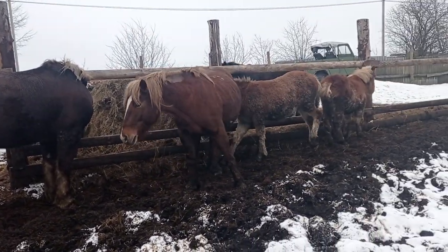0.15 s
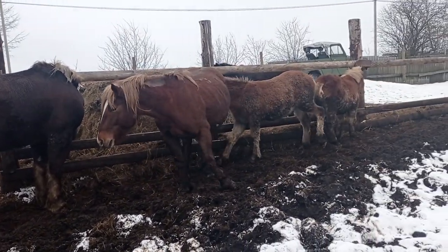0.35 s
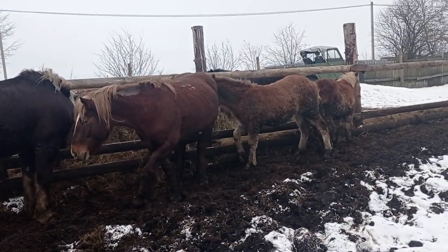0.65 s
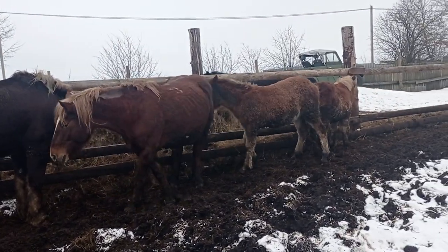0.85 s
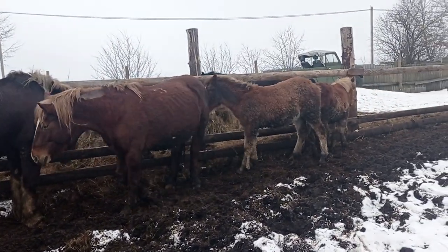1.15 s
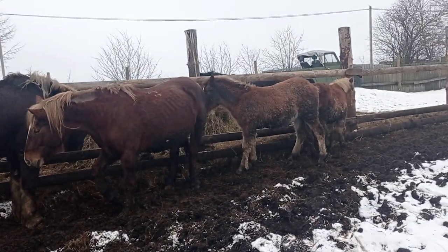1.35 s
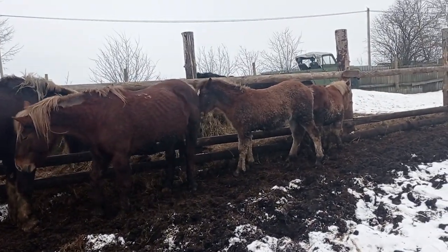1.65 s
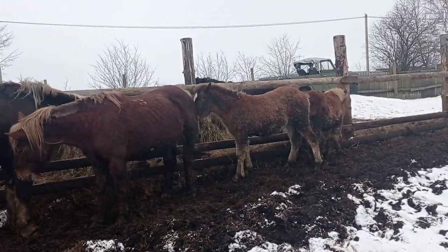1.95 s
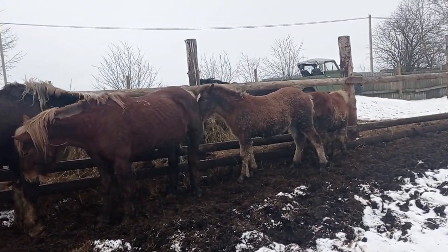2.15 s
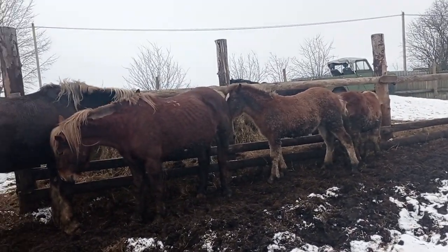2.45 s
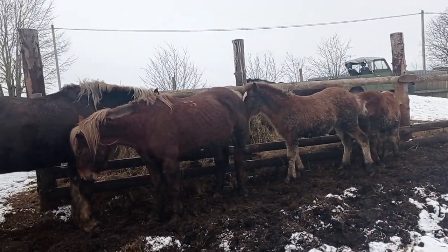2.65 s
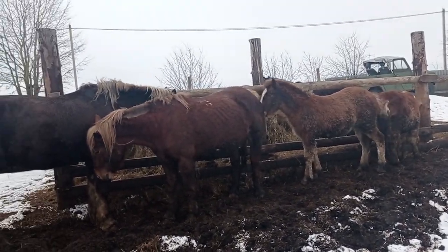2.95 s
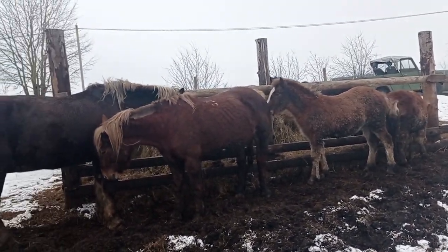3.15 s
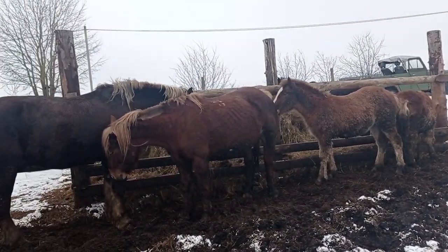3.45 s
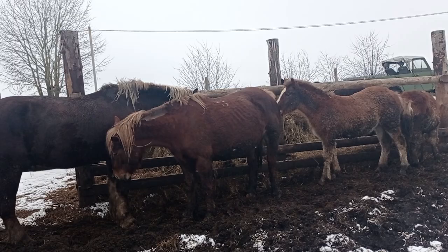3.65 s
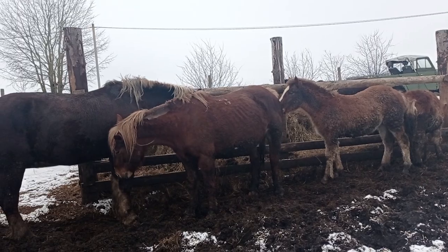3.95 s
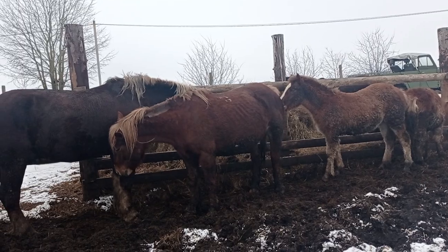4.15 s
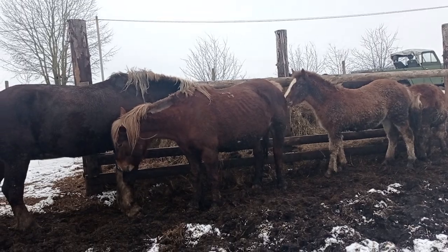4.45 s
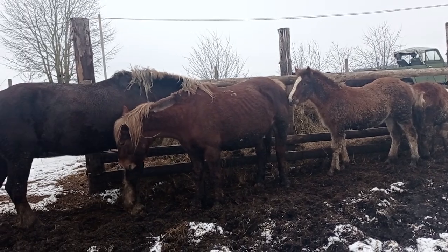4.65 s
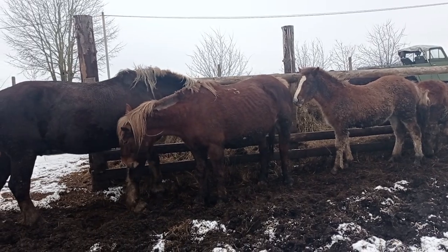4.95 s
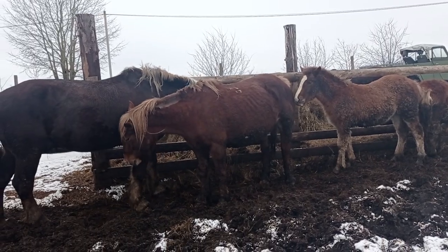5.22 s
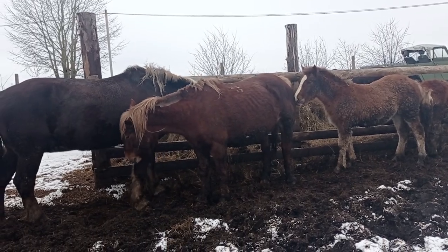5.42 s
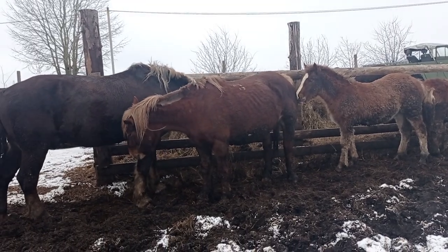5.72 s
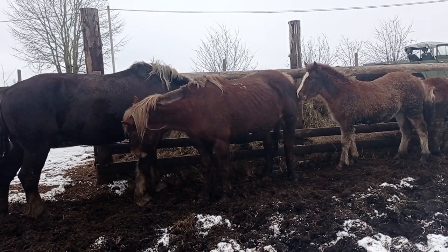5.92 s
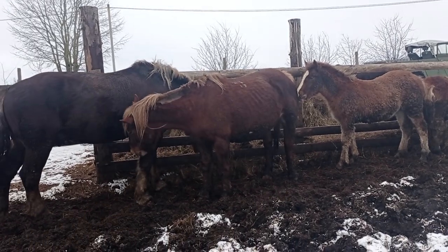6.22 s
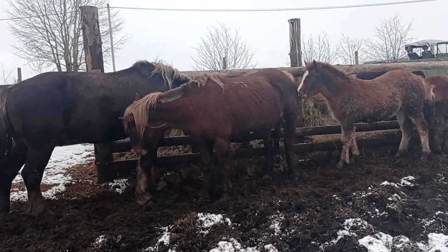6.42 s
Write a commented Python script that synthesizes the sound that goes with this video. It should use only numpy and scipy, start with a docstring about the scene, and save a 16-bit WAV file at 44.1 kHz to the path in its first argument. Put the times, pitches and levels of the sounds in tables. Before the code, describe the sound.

Outdoors in a muddy winter paddock, a dry steel joint squeals high and unevenly in repeated swings, with gritty rasping, small jolts and a few dull early thuds. Wind buffets the single close microphone at first. After about 4.7 seconds the squeal stops; hay stalks crackle and snap sparsely, then loudly near six seconds, over a faint open-field hiss.

```python
"""A dry steel joint squeals as it swings to and fro beside a hay rack in a muddy winter paddock.
The squeal is a wavering tone with overtones and a rough skirt; sliding rasps through the frame as
noise on its modes. Horses pull hay: stalks rustle and snap as broken-up noise. Thuds are low, dying
sines. Wind buffets the single microphone as patchy low noise, over the hiss of the open field."""
import sys
import numpy as np
from scipy import signal
from scipy.fft import rfft, irfft, next_fast_len
from scipy.io import wavfile
from scipy.ndimage import uniform_filter1d, map_coordinates

SR = 44100
rng = np.random.default_rng(int(sys.argv[2]) if len(sys.argv) > 2 else 0)


def to_wav(sig):
    """Store sig (one row per channel, or 1-D mono) as 16-bit WAV at the path in sys.argv[1].

    Samples outside -1..1 are clipped; the rate is SR.
    """
    pcm = np.clip(np.atleast_2d(sig), -1, 1) * 32767
    pcm = np.round(pcm).astype(np.int16)
    wavfile.write(sys.argv[1], SR, pcm.T)  # frames by channels


N = 290341  # samples


def amp(db):
    """Amplitude ratio of a level in dB."""
    return 10 ** (np.asarray(db) / 20)


def unit(x):
    """x scaled to rms 1."""
    return x / np.sqrt(np.mean(x ** 2) + 1e-20)


def curves(rows):
    """One value per sample for each column after the time."""
    s, *cols = np.transpose(rows)
    return [np.interp(np.arange(N) / SR, s, c) for c in cols]


def wobble(rate):
    """A smooth random curve, rate knots a second."""
    knots = rng.standard_normal(int(N * rate / SR) + 4)
    return map_coordinates(knots, [np.arange(N) * rate / SR])


def filtered(x, response):
    """x times a complex response of frequency."""
    m = next_fast_len(N + SR // 2)
    return irfft(rfft(x, m) * response(np.fft.rfftfreq(m, 1 / SR)), m)[..., :N]


def colour(points):
    """Gain through (Hz, dB) points on a log frequency axis."""
    f, db = np.transpose(points)
    return lambda hz: amp(np.interp(np.log(hz + 1), np.log(f + 1), db))


def modes(table):
    """Causal response of a set of resonances, each applied twice for dark valleys."""
    def response(f):
        return sum(amp(db) * (1j * f * width / (centre * centre - f * f + 1j * f * width)) ** 2
                   for centre, width, db in table)
    return response


def noise(response, patchy_db):
    """Coloured noise of rms 1 with time-frequency patches of random gain."""
    z = signal.stft(rng.standard_normal(N), nperseg=512)[2]
    field = uniform_filter1d(uniform_filter1d(rng.standard_normal(z.shape), 5, 0), 10, 1)
    patchy = signal.istft(z * amp(patchy_db * unit(field)), nperseg=512)[1][:N]
    return unit(filtered(patchy, response))


def bursts(times, dbs, t60s, attack):
    """An envelope that rises fast at each time and dies away, followed for half a second."""
    env, t = np.zeros(N + SR), np.arange(SR // 2) / SR
    for s, db, t60 in zip(times, dbs, t60s):
        env[round(s * SR):][:len(t)] += amp(db - 60 * t / max(t60, .005)) * (1 - np.exp(-t / attack))
    return env[:N]


def swells(times, dbs, t60s, rise):
    """An envelope that builds to each time and dies away; the build lasts rise times the decay."""
    t = np.arange(0, N, 64) / SR
    late = (t - np.c_[times]) / np.c_[np.maximum(t60s, .02)]
    coarse = amp(np.c_[dbs] - 60 * np.maximum(late, -late / rise)).sum(axis=0)
    return np.interp(np.arange(N) / SR, t, coarse)


def squeal():
    """Stick-slip locks on the main mode; the uneven grip frays it and adds overtones."""
    # the squeal's path, one list per swing of the joint: time_s, pitch_hz, level_db
    swings = [
        [(0.0, 3800, -53), (0.012, 3806, -39), (0.024, 3800, -53), (0.062, 3794, -35), (0.156, 3786, -65),
         (0.288, 3830, -42), (0.292, 3803, -61), (0.306, 3794, -36.5), (0.356, 3774, -30.5), (0.37, 3826, -40),
         (0.566, 3736, -67.5), (0.68, 3815, -73)],
        [(0.72, 3950, -78), (0.744, 3789, -53.5), (0.878, 3797, -65), (0.892, 3761, -50), (0.928, 3780, -35),
         (1.042, 3780, -66), (1.05, 3856, -54), (1.186, 3739, -50.5), (1.196, 3780, -38), (1.262, 3864, -57),
         (1.442, 3820, -91), (1.45, 3760, -79)],
        [(1.6, 3949, -95), (1.634, 3824, -54.5), (1.68, 3803, -50.5), (1.704, 3777, -71.5),
         (1.792, 3980, -48.5), (1.932, 3830, -82), (1.946, 3885, -53), (1.958, 3995, -64), (2.084, 3704, -67),
         (2.114, 3826, -42), (2.174, 3830, -39), (2.36, 3821, -73.5)],
        [(2.39, 3820, -78), (2.408, 3757, -43), (2.448, 3790, -33.5), (2.474, 3800, -49), (2.54, 3760, -26.5),
         (2.558, 3858, -44), (2.654, 3815, -37), (2.72, 3820, -59), (2.764, 3780, -49), (2.854, 3848, -63),
         (2.956, 3814, -54.5), (3.1, 3870, -81)],
        [(3.15, 3790, -96), (3.176, 3755, -49), (3.218, 3786, -46.5), (3.352, 3797, -43.5), (3.41, 3750, -58.5),
         (3.444, 3923, -61), (3.454, 3773, -61), (3.534, 3828, -47), (3.614, 3932, -61.5), (3.786, 3780, -63),
         (3.808, 3840, -49), (3.93, 3704, -88.5)],
        [(3.96, 3800, -85), (4.03, 3797, -48), (4.072, 3770, -55.5), (4.164, 3720, -37), (4.196, 3770, -54),
         (4.212, 3830, -44.5), (4.322, 3796, -64.5), (4.35, 3768, -42.5), (4.508, 3773, -58.5),
         (4.578, 3840, -55.5), (4.672, 3905, -86), (4.7, 3680, -72)],
    ]
    # sharpness of the slips, one row a swing, octave re main line: at_start_db, at_end_db
    octave_db = [(-24.5, -8), (-21, -5.5), (-21, -28.5), (-21, -19), (-11, -30), (-25, -6.5)]
    # moments where the joint grips suddenly and the squeal jumps: start_s, level_db
    catches = [(0.0443, -37), (0.306, -38), (0.8917, -46), (1.1924, -44), (2.49, -32), (2.526, -39),
               (4.126, -35.5), (4.348, -39), (4.3932, -37)]
    catch_t60_s, catch_attack_s = 0.046, 0.0046
    octave_grows, firm_db = 0.9, -41  # exponent of octave level against the main line, about this level

    hz, db = curves(np.concatenate(swings))
    sharp_rows = [(swing[end][0], pair[end]) for swing, pair in zip(swings, octave_db) for end in (0, -1)]
    sharp_db, = curves(sharp_rows)
    s, catch_db = np.transpose(catches)
    fade = np.clip((swings[-1][-1][0] - np.arange(N) / SR) / 0.022, 0, 1)

    # a weak squeal locks loosely and wanders more
    loose = np.clip((-25.0 - db) / 14, .3, 1.6)
    wander_hz = loose * (16 * wobble(60) + 9 * wobble(300))
    phase = 2 * np.pi * np.cumsum(hz + wander_hz) / SR
    grip_db = 3 * wobble(70)

    # the overtones beat and blur more than the main line
    def fray(rate):
        return wobble(rate) + 1.26
    overtones = (fray(120) + .5 * wobble(600)) * np.sin(2 * phase)
    overtones += amp(-27.0) * fray(200) * np.sin(3 * phase)
    overtones += amp(-44.0) * fray(300) * np.sin(4 * phase)

    level = np.sqrt(2) * amp(db) + bursts(s, catch_db, np.full(len(s), catch_t60_s), catch_attack_s)
    main_line = level * amp(loose * grip_db) * np.sin(phase)
    octave_level = level * (level / amp(firm_db)) ** (octave_grows - 1)
    tone = main_line + octave_level * amp(sharp_db + grip_db) * overtones

    # skipped slips spread a rough skirt round the main line
    skirt_modes = modes([(3500, 110, -3), (3747, 200, 2.5), (3990, 72, -3)])
    skirt = loose ** 2 * amp(db - 11) * noise(skirt_modes, patchy_db=5.5)

    # two slips at once rub against each other: sum and difference tones
    rub = 1 + amp(13.0) * fade * amp(db) * np.sin(phase)
    return fade * (tone + skirt) + squeaks() * rub


def squeaks():
    """Brief slips that lock on one mode: a quick start, an uneven hold, a soft end."""
    # short squeaks and hums: start_s, length_s, first_hz, last_hz, level_db (before the grip and 1 dB lift)
    brief_slips = [(.16, 0.083, 2518, 2490, -52), (.21, 0.074, 6400, 6080, -52),
                   (.91, 0.11, 4120, 4170, -50), (1.15, 0.082, 2520, 2550, -54.5),
                   (1.628, .13, 3580, 3440, -59), (1.765, 0.085, 4340, 4170, -51.5),
                   (1.797, 0.12, 311, 305, -63.5), (1.81, .057, 12100, 12300, -69),
                   (2.02, 0.08, 5490, 5520, -46), (2.187, .18, 317.6, 299, -62.5),
                   (2.409, 0.15, 6470, 6430, -51.5), (2.423, 0.24, 2665, 2590, -68),
                   (2.583, 0.12, 307, 308, -63.5), (2.79, 0.094, 6100, 6260, -63),
                   (2.96, 0.12, 296, 302, -55), (3.15, 0.064, 5000, 4990, -56),
                   (3.211, .13, 1900, 1910, -55.5), (3.37, 0.088, 306, 312, -61.5),
                   (3.539, 0.13, 1592, 1618, -47.5), (3.7, 0.29, 313, 317.6, -61),
                   (3.831, 0.12, 536, 527.5, -62), (3.97, 0.1, 4964, 4887, -56),
                   (4.017, 0.13, 2630, 2630, -61), (4.032, .18, 6420, 6500, -60.5),
                   (4.04, 0.095, 5250, 5200, -56.5), (4.209, 0.13, 312, 315, -65.5),
                   (4.518, 0.12, 4110, 4104, -54.5), (4.552, 0.045, 1606, 1616, -53),
                   (4.626, 0.154, 2760, 2900, -56.5), (4.652, .28, 325, 308.4, -68),
                   (4.63, 0.15, 3910, 3340, -67), (4.703, 0.18, 3570, 3270, -57.5),
                   (4.915, 0.027, 2170, 1880, -56), (5.323, 0.087, 5800, 5730, -72),
                   (5.321, 0.14, 2900, 2860, -64.5), (5.33, .19, 529, 513, -71),
                   (5.822, .11, 1298, 1220, -66.5), (5.831, 0.044, 3870, 3900, -65),
                   (5.988, .06, 5360, 5350, -73), (5.985, 0.22, 1260, 1252, -68),
                   (5.998, .026, 3770, 3770, -60), (5.998, 0.07, 1550, 1583, -58.5),
                   (6.0, .035, 6170, 6140, -67), (6.423, 0.15, 1623, 1655, -63),
                   (6.453, .13, 296, 293, -62.5)]
    waver_floor_hz, waver_share = 7, 0.0022  # the pitch wavers more on high modes
    waver_per_glide = .8  # Hz of blur per Hz of glide

    out = np.zeros(N + SR)
    waver, blur = wobble(150), wobble(700)
    grip = amp(1.9 * wobble(60)) * (1.12 + .5 * wobble(160) + 0.214 * wobble(700))
    for s, length, hz0, hz1, db in brief_slips:
        # a gliding slip locks poorly and blurs into a rough band
        waver_hz = (waver_floor_hz + waver_share * hz0) * waver
        waver_hz = waver_hz + waver_per_glide * abs(hz1 - hz0) * blur
        u, i = np.linspace(0, 1, round(length * SR)), round(s * SR)
        phase = 2 * np.pi * np.cumsum(hz0 + (hz1 - hz0) * u + waver_hz[i:][:len(u)]) / SR
        shape = grip[i:][:len(u)] * np.sin(np.pi * u ** 0.59)
        out[i:][:len(u)] += amp(db + 1) * shape * np.sin(phase)
    return out[:N]


def rasp():
    """Sliding grit rasps and drives the frame's modes; each jolt makes both leap up and die away."""
    # sliding strokes, nominal levels: peak_s, rasp_db, t60_s, low_re_rasp_db, middle_re_rasp_db
    slides = [(0.03, -54, 1, 5, -2.5), (0.22, -52, 0.89, -11, -1.5), (0.328, -43.5, 0.46, 2, -6),
              (0.741, -59.5, 0.86, 7.5, -2.5), (0.958, -45, .4, 7, -7), (1.072, -53.5, 0.9, 8.5, -0.5),
              (1.539, -65.5, 0.57, 13, -4), (1.79, -74.5, 0.26, 1, 10), (1.962, -56, 0.21, 3, 5),
              (2.052, -45, 0.33, -7, 1), (2.098, -43, 0.23, 1, -0.5), (2.2, -74.5, 0.26, 2, 10),
              (2.43, -64.5, 0.28, -27, -18.5), (2.571, -69.5, 0.23, 12.5, -13),
              (2.909, -64, 0.45, 9.5, 2.5), (3.199, -54.5, 0.29, -12, -29), (3.26, -75, .3, -4, -9.5),
              (3.32, -58, 0.19, -18.5, -14), (3.442, -51, 0.17, -1.5, 4), (3.498, -47, 0.41, 4.5, -0.5),
              (3.57, -58.5, 0.2, 3, -18), (3.719, -51.5, .3, 5.5, -8.5), (3.77, -56, 0.22, 8, 4),
              (3.977, -61.5, 0.19, -7, -23), (4.13, -66, 1, -8, -12.5), (4.419, -50, 0.059, -7.5, -1),
              (4.631, -51.5, 0.64, -6, -13.5), (4.7, -61.5, 0.3, -4.5, -8.5), (4.79, -66, 0.067, -8.5, -14)]
    # jolts as the joint takes up its play, nominal levels: start_s, level_db, low_re_level_db, t60_s
    play_jolts = [(0.5374, -48.5, 6.5, 0.32), (0.7255, -42.5, 8.5, 0.2), (1.0464, -36, 2.5, 0.56),
                  (1.346, -44.5, 0.5, 0.17), (1.496, -55, 8.5, 0.45), (1.7727, -47, 0, 0.26),
                  (1.944, -37, -3, 0.55), (2.2883, -64, 21, 0.35), (2.547, -39, -2.5, 0.19),
                  (2.7317, -41.5, -0.5, 0.4), (2.877, -46, 5.5, 0.25), (3.0887, -65.5, 26, 0.22),
                  (3.3228, -42.5, 0.5, 0.17), (3.4211, -44.5, -15.5, 0.27), (3.7144, -39, -3.5, 0.17),
                  (3.8866, -69.5, 25.5, 0.18), (3.9692, -42.5, -28, 0.16), (4.522, -56, -8, 0.097),
                  (4.6075, -51, -5.5, 0.34), (5.8336, -60, 7.5, 0.62), (6.0047, -60.5, 12, 0.19),
                  (6.406, -70, 20, 0.93)]
    # spectrum of the grit between the sliding faces: frequency_hz, relative_density_db
    grit_spectrum = [(240, -61.5), (400, -35.5), (562, -34), (1290, -18.5), (1420, -18), (1630, -1),
                     (2290, -6.5), (2470, -13.5), (3310, -11), (3930, 7.5), (4580, -9.5), (6640, 0.5),
                     (10400, -29.5), (16000, -42.5)]
    slide_rise = 0.44  # a stroke builds in this share of the time it takes to die
    jolt_attack_s = .0005

    at, db, length, low_db, mid_db = np.transpose(slides)
    s, peak, low, t60 = np.transpose(play_jolts)

    def strokes(dbs):
        return swells(at, dbs, length, slide_rise)

    chatter = amp(1.4 * wobble(40) + 1.07 * wobble(350))
    jolts = bursts(s, peak - 9, t60, jolt_attack_s)
    low_jolts = bursts(s, peak + low - 6.5, t60, jolt_attack_s)

    grit = noise(colour(grit_spectrum), patchy_db=4.5)

    def below(edge_hz):
        return filtered(grit, lambda hz: 1 / (1 + (hz / edge_hz) ** 16))

    low_grit, mid_grit = below(2140), below(3500)
    bottom = amp(-8) * unit(low_grit) + amp(-6.0) * ringing(200, 2300)
    middle = amp(-10) * unit(mid_grit - low_grit) + amp(-4.0) * ringing(2300, 3400)
    top = amp(-1.5) * unit(grit - mid_grit) + amp(-11.0) * ringing(3400, 9000)

    sliding = (strokes(db + low_db) + low_jolts) * bottom
    sliding += (strokes(db + mid_db) + amp(-3) * jolts) * middle
    sliding += (strokes(db) + jolts) * top
    return chatter * sliding


def ringing(lo_hz, hi_hz):
    """Noise through the frame's modes within a range, each swelling and fading by itself, at rms 1."""
    # the frame's modes: centre_hz, width_hz (of one pass; modes() applies two), relative_level_db
    frame = [(318.8, 13, -7.5), (733.4, 72, -12), (1030, 27, -26.5), (1263, 44, -15.5), (1629.3, 39.5, 2.5),
             (1855, 76, -3.5), (2049, 66, -5.5), (2196, 40, -8.5), (2474, 61, 5.5), (2733, 150, 2),
             (3083, 29, 4), (3217, 67, -5), (3445, 18, -2), (4000, 140, -1.5), (4830, 68, -2),
             (5370, 13, 2), (6600, 45, -2), (6370, 25, 3.5), (6350, 55, -7), (5950, 45, -8.5),
             (7800, 130, -6.5)]
    flicker_db = 5
    drive = rng.standard_normal(N)
    return unit(sum(amp(flicker_db * wobble(12)) * filtered(drive, modes([mode]))
                    for mode in frame if lo_hz < mode[0] < hi_hz))


def hay():
    """Dense breaking fibres under a rustle; each snap is a sharp crack with a crackle after it."""
    # snapping stalks, nominal levels: start_s, level_db, brightness_db, crackle_t60_s
    stalk_snaps = [(0.5395, -24, -16.5, 0.055), (0.5876, -33, -29, 0.042), (1.0485, -44, -16, 0.04),
                   (1.347, -41, -26, 0.056), (1.7731, -50, -21.5, 0.056), (4.4172, -24.5, -8.5, 0.016),
                   (4.7205, -23.5, -11, 0.13), (5.032, -48.5, -19, 0.12), (5.1195, -66, 6, .035),
                   (5.2497, -35.5, -10, 0.024), (5.2861, -22.5, -25, 0.064), (5.3844, -62, 4, .04),
                   (5.436, -52, -16, 0.07), (5.5397, -69, -4.5, 0.064), (5.676, -50, 2, 0.11),
                   (5.7294, -36, -23, 0.03), (5.9394, -66, -12, .05), (6.0878, -19, -7, 0.057),
                   (6.1218, -33.5, -41, 0.086), (6.2651, -16, -20, 0.051), (6.2767, -24, -43, 0.031),
                   (6.3289, -25, -45, 0.046), (6.517, -29.5, -40, 0.042)]
    # swells of rustling hay, some brief and some a long faint bed, nominal levels:
    # peak_s, rustle_db, t60_s, brightness_db
    rustle_swells = [(4.8, -58.5, 1.03, -4), (5.286, -65, 0.25, 5), (5.325, -72.5, 0.2, 15.5),
                     (5.1, -89, 0.54, 10), (5.55, -82.5, 1.6, -8.5), (5.7, -53, 0.28, -12.5),
                     (5.846, -58.5, 0.23, -15), (5.92, -58, 0.19, 1), (6.018, -78, 0.33, -13),
                     (6.087, -51, .36, -9), (6.251, -38, 0.11, 0), (6.278, -44, 0.15, -16.5),
                     (6.333, -43, 0.088, -17), (6.438, -55, 0.4, 1.5), (6.56, -61, .5, -12)]
    # spectrum of a breaking stalk: frequency_hz, relative_density_db
    stalk_spectrum = [(240, -38), (400, -27.5), (1420, -13), (1790, -6.5), (2430, -13), (3070, -9),
                      (5270, -10), (7280, 4), (8370, -15.5), (9470, -14.5), (16000, -39.5)]
    rustle_rise = 0.48  # a swell builds in this share of the time it takes to die
    crack_attack_s, crack_t60_s = .0006, .01
    crackle_db, crackle_attack_s = -7, 0.0045  # level re the crack

    s, peak, bright, t60 = np.transpose(stalk_snaps)
    at, db, length, bright_db = np.transpose(rustle_swells)

    def rustle(dbs):
        return swells(at, dbs, length, rustle_rise)

    def snaps(dbs):
        cracks = bursts(s, dbs, np.full(len(s), crack_t60_s), crack_attack_s)
        return cracks + bursts(s, dbs + crackle_db, t60, crackle_attack_s)

    fibres = unit(amp(1.7 * wobble(500)) * noise(colour(stalk_spectrum), patchy_db=4.5))
    high = filtered(fibres, lambda hz: 1 / (1 + (4800 / (hz + 1)) ** 8))
    dull = (snaps(peak - 3) + rustle(db)) * (fibres - high)
    bright_part = (snaps(peak + bright + 0.57) + rustle(db + bright_db - 11.5)) * high
    return dull + bright_part


def thuds():
    """Soft blows: a low swing that dies in a few cycles."""
    # the blows: start_s, level_db (before a 5.5 dB lift), pitch_hz, cycles until 30 dB down
    blows = [(0.0938, -19, 424, 1.56), (0.231, -20.5, 147, 1.4), (0.265, -25.5, 145, 2.9),
             (0.094, -28.5, 1440, 1.8), (.682, -24, 910, 1.26), (0.685, -19, 308, 1.56),
             (0.925, -32.5, 279.6, 3.3), (1.96, -36, 106, 3.4), (2.569, -46, 175.4, 3.3),
             (3.09, -48.5, 197.7, 14.3), (3.197, -31.5, 136, 5.8), (3.892, -49, 197, 9.7)]
    out, t = np.zeros(N + SR), np.arange(SR // 5) / SR
    for s, db, hz, cycles in blows:
        decay = amp(db + 5.5 - 60 * t * hz / cycles / 2)
        onset = 1 - np.exp(-t * hz / 0.29)
        out[round(s * SR):][:len(t)] += decay * onset * np.sin(2 * np.pi * hz * t)
    return out[:N]


def wind():
    """Eddies roll past the microphone one after another, over the still hiss of the field."""
    # gusts on the microphone: peak_s, buffet_db, t60_s, flutter_re_buffet_db
    gusts = [(0.108, -47, 0.067, -12), (0.267, -31, 0.26, -20), (0.368, -52, 0.25, 7),
             (0.46, -37.5, 0.09, -51), (0.569, -46, .22, -38), (0.692, -42.5, 0.43, -17.5),
             (0.92, -52, 0.82, -15), (1.12, -56, 0.29, 7.5), (1.408, -37, 0.36, -27),
             (1.62, -52.5, 0.45, -34.5), (1.739, -51.5, 0.39, -79), (1.96, -56, 0.45, -41),
             (2.121, -52, 0.17, -14), (2.24, -55.5, 0.55, -11), (2.599, -59.5, 0.2, -4.5),
             (2.901, -60.5, 0.34, -5.5), (3.101, -57, 0.3, -3.5), (3.219, -38.5, 0.16, -19),
             (3.352, -44.5, 0.19, -15.5), (3.57, -61.5, 0.69, -17), (3.9, -73, 0.75, 10.5),
             (6.17, -67.5, 0.22, 2.5), (6.54, -60.5, 0.87, 1.5)]
    # the wind between gusts: time_s, buffet_db, flutter_db
    lull = [(0, -51.5, -58.5), (1.2, -69.5, -70), (2.4, -72.5, -75), (4.1, -79.5, -73.5), (5.26, -78, -74),
            (5.85, -76, -77.5), (6.58, -85, -68.5)]
    # spectra of the deep buffeting, the flutter above it and the field's air:
    # frequency_hz, relative_density_db
    buffet_spectrum = [(18, -53), (30, -15), (55, 2), (97, 6.5), (162, 1.5), (227, -10.5), (300, -11),
                       (390, -53.5), (660, -120)]
    flutter_spectrum = [(88, -32), (150, -4), (304, -4.5), (784, -12.5), (850, -7.5), (948, -14.5),
                        (1300, -12.5), (1690, -39), (2860, -120)]
    air_spectrum = [(24, -24), (40, 10), (91, 5.5), (220, -36), (276, -2.5), (467, 1.5), (1020, -10.5),
                    (1680, -12.5), (2210, -24), (6650, -36), (7170, -24.5), (9220, -31.5), (16000, -42)]
    air_db = -72.5
    gust_rise = 0.83  # a gust builds in this share of the time it takes to die

    s, db, t60, flutter_db = np.transpose(gusts)
    calm, calm_flutter = amp(curves(lull))
    eddies = noise(colour(buffet_spectrum), patchy_db=9.5)
    # even out the noise's own swells, so that the gusts and the lull set the loudness
    power = np.abs(uniform_filter1d(eddies ** 2, 1500))
    eddies = unit(eddies / (power + 0.14) ** 0.36)
    buffeting = (calm + swells(s, db, t60, gust_rise)) * eddies

    lumps_db = 2 * wobble(25)
    lumpy = unit(amp(lumps_db) * noise(colour(flutter_spectrum), patchy_db=7.0))
    flutter = (calm_flutter + swells(s, db + flutter_db, t60, gust_rise)) * lumpy
    return buffeting + flutter + amp(air_db) * noise(colour(air_spectrum), patchy_db=6.0)


def scene():
    """Joint, hay, thuds and wind summed on one channel."""
    return (squeal() + rasp() + hay() + thuds() + wind())[None]


def record(dry):
    """The microphone cuts the deepest bass, has a port resonance near its band limit, nothing above."""
    bass_cut_hz, top_hz = 45, 15850
    port = modes([(15000, 1500, 11)])

    def microphone(hz):
        return (1 + port(hz)) / (1 - 1j * bass_cut_hz / (hz + 1)) ** 2 * (hz < top_hz)
    return filtered(dry, microphone)


dry = scene()
out = record(dry)
to_wav(out)
```